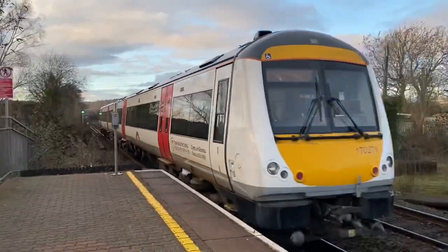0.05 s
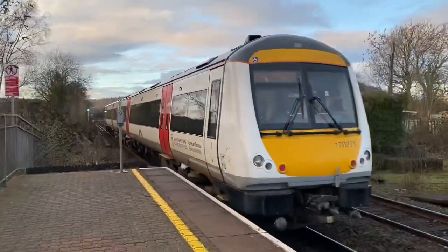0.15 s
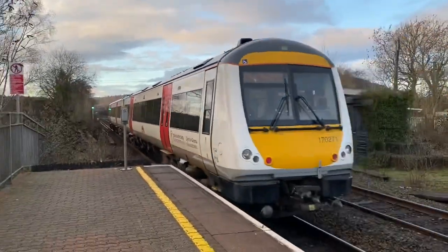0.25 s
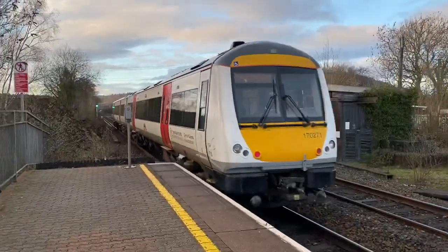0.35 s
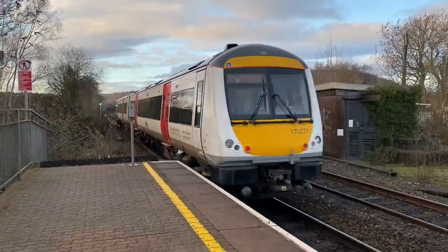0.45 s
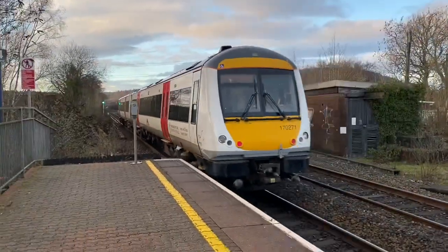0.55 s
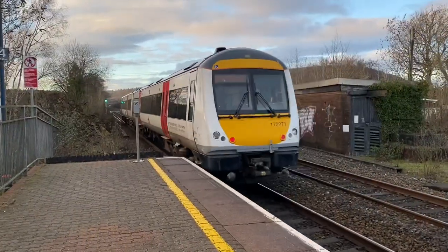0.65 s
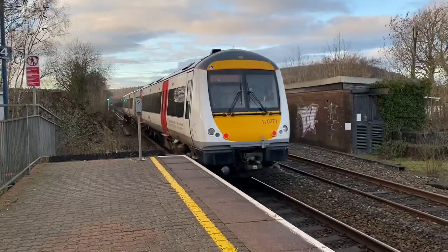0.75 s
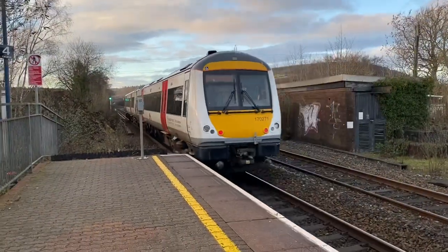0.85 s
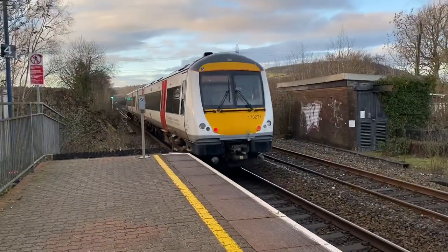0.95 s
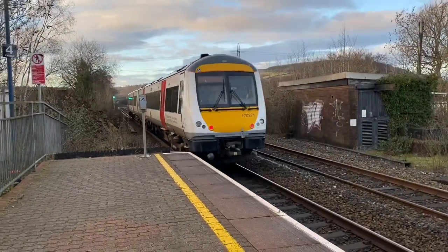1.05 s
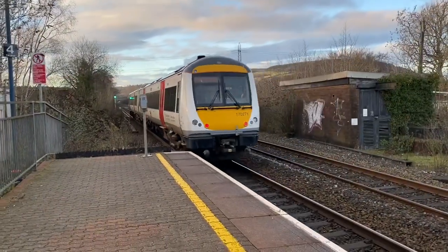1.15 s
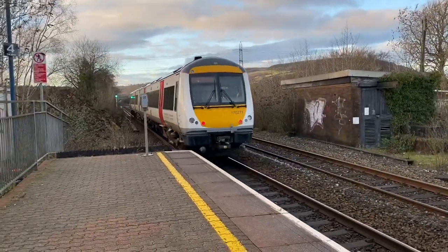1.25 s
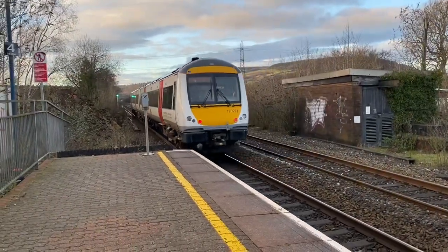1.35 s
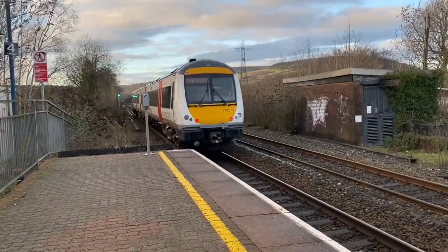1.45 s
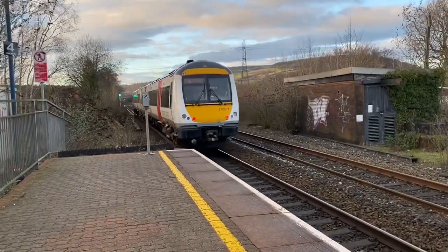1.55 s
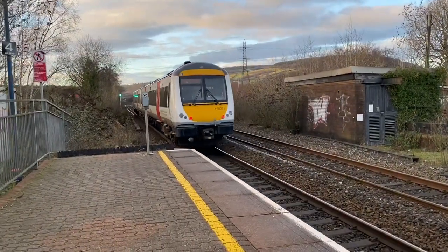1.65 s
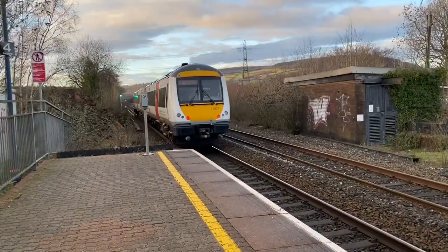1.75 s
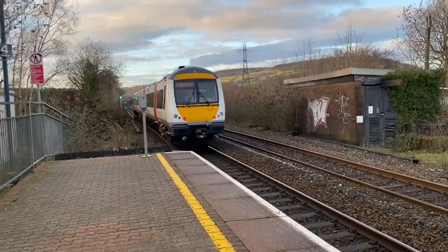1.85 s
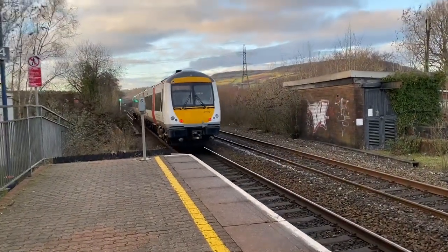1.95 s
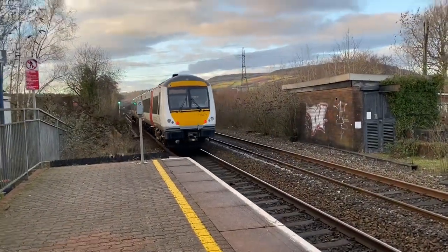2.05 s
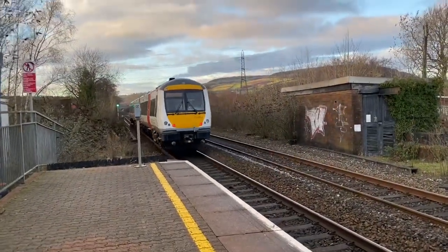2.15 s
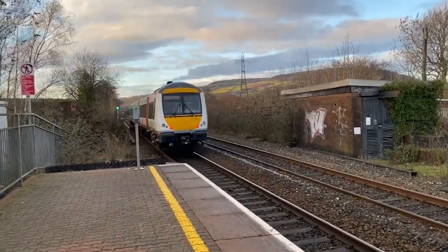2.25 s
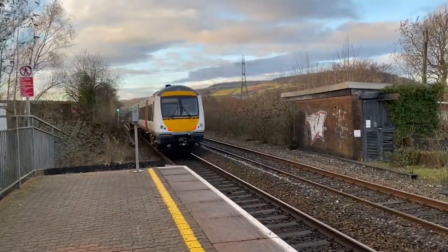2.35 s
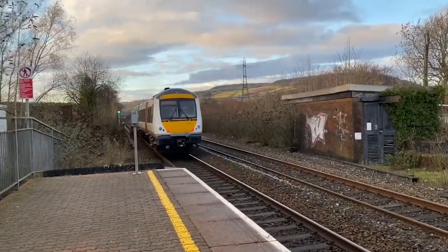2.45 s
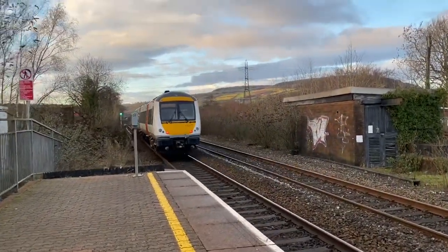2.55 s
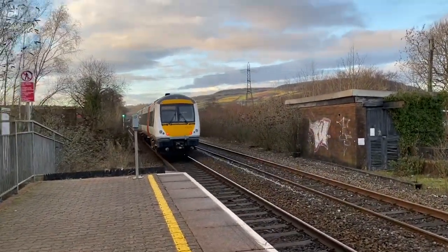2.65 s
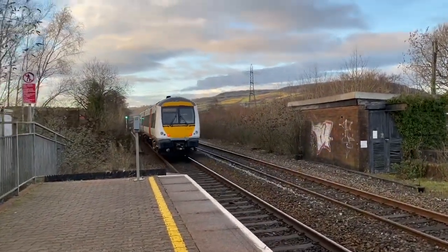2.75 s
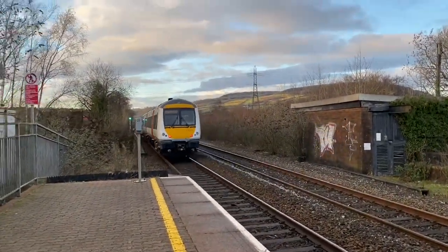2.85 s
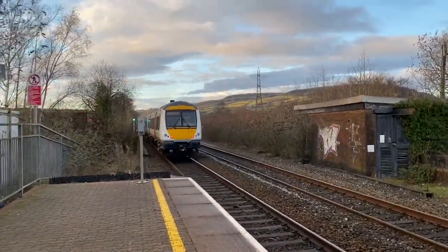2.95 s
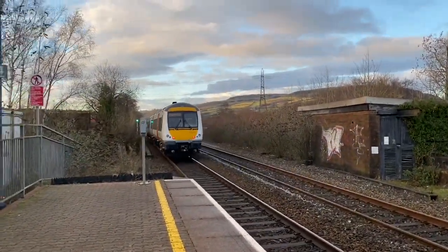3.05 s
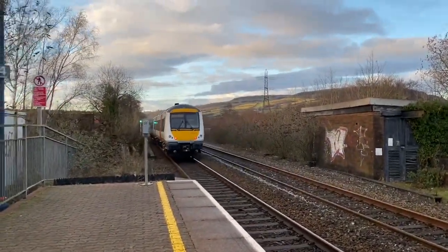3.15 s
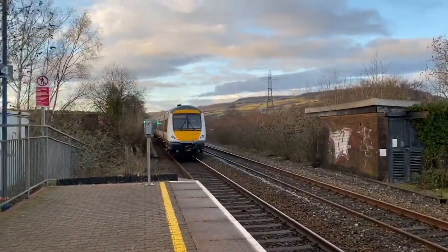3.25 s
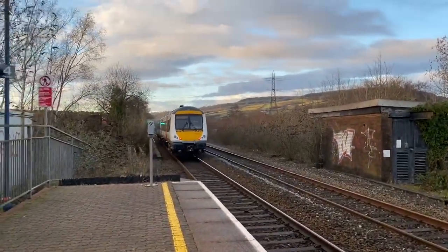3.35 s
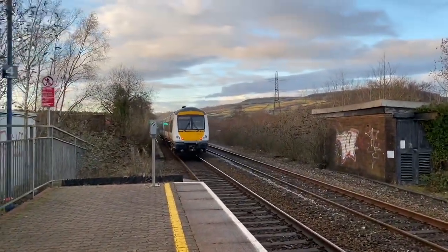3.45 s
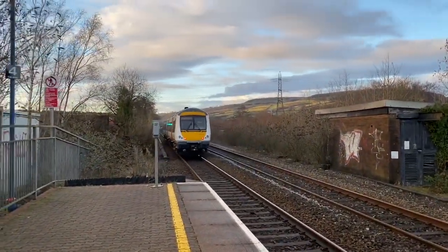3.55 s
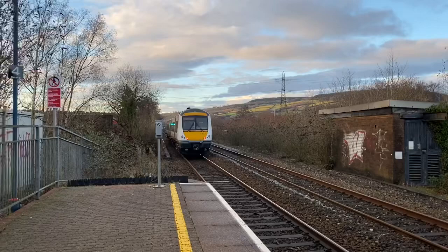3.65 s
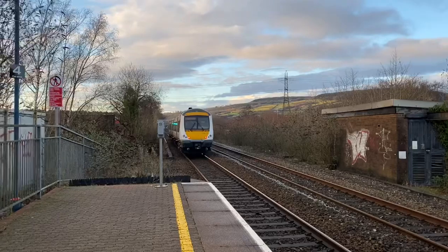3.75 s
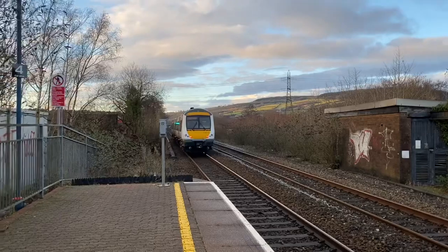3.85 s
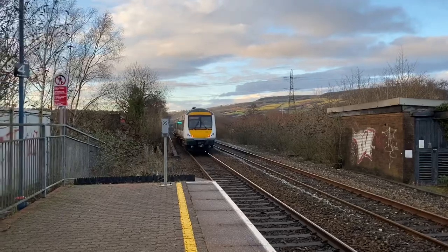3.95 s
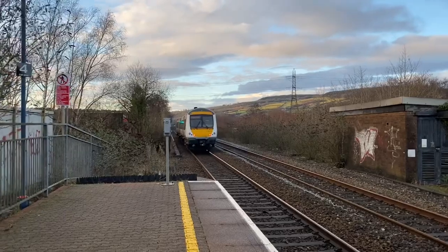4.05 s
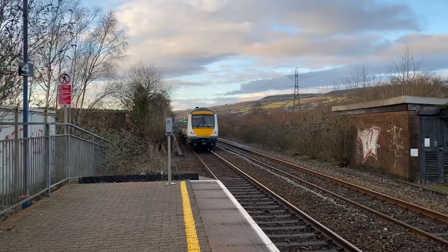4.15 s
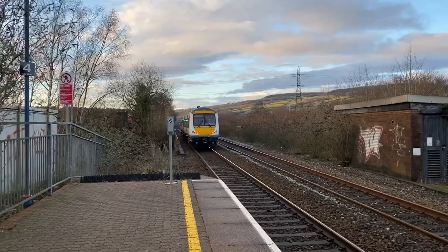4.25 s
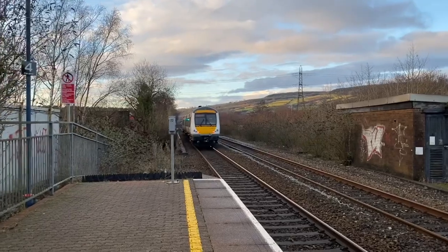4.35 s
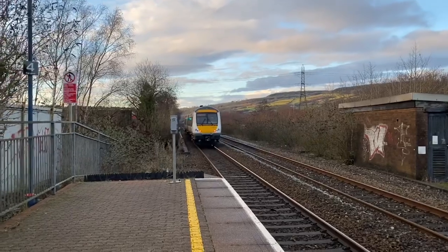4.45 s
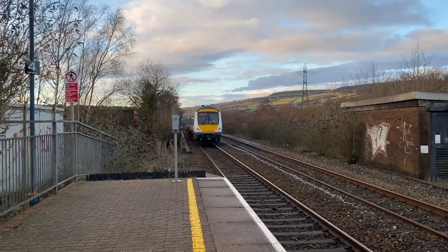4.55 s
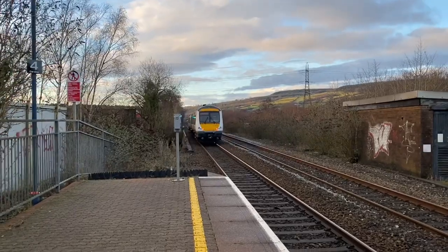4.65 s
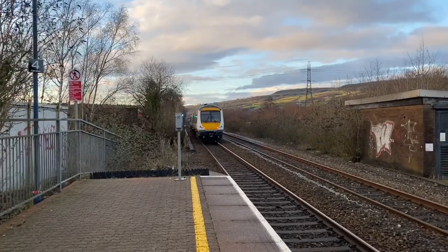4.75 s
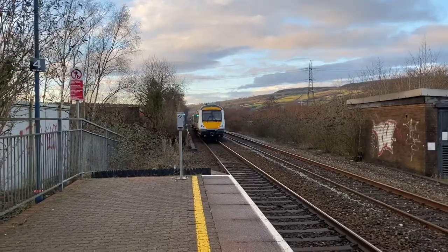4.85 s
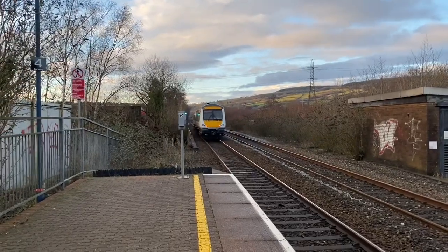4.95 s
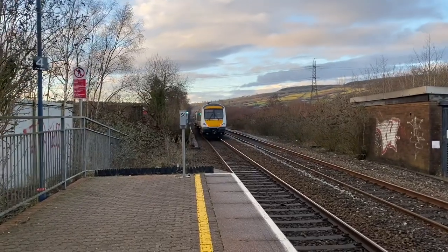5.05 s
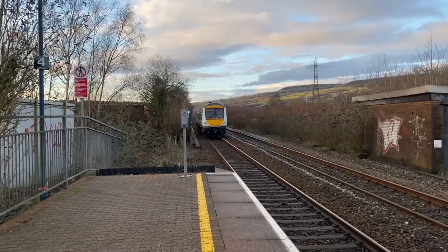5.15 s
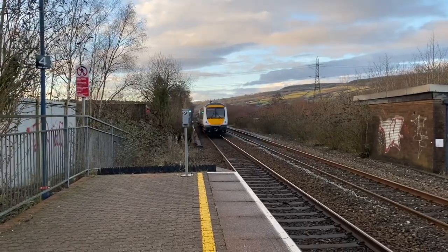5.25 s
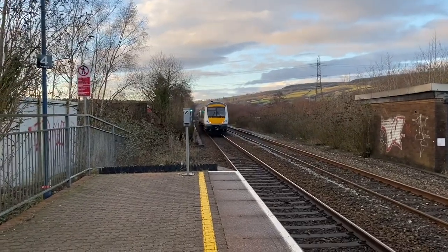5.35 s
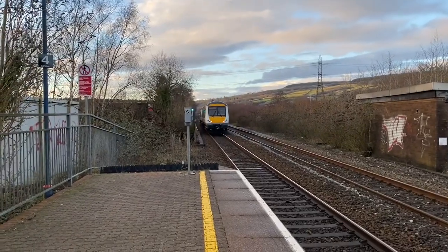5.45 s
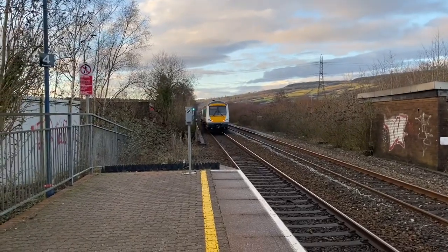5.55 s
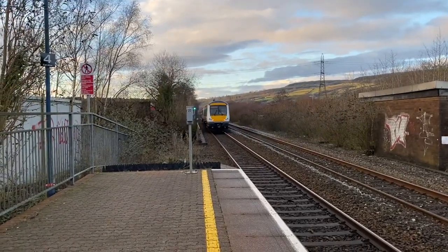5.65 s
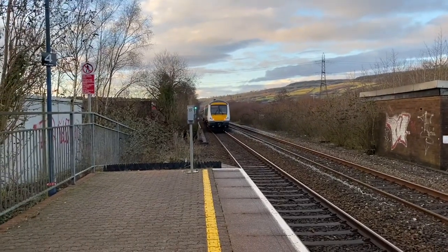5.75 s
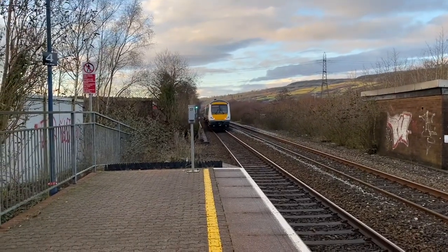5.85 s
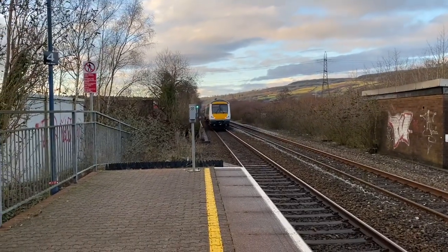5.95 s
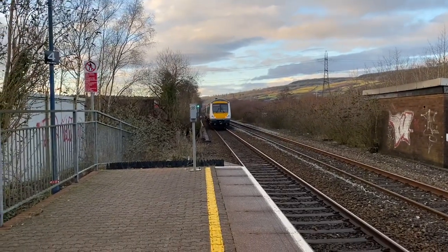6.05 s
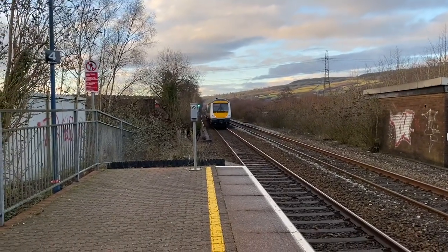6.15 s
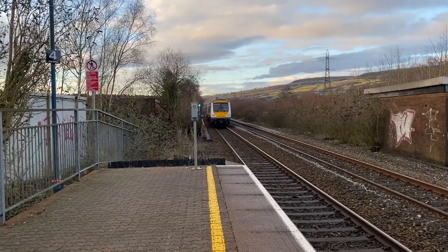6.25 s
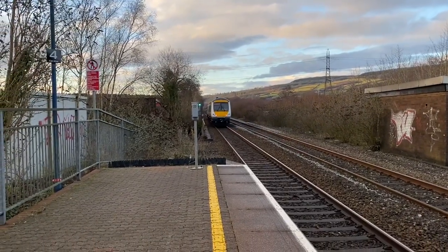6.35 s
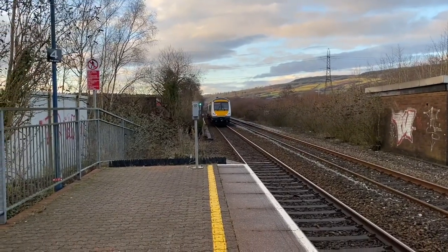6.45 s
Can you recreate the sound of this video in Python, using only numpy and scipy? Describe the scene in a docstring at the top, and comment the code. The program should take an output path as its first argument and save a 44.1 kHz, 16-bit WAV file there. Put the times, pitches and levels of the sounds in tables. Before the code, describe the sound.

A diesel train leaves a platform, heard close by in outdoor stereo, middle frequencies leaning slightly left. From 0 s it is near and loud: two engines drone with a low buzzing hum, one revving up in pitch over the first few seconds, the other steadier, so they throb together. Diesel knock, body rumble, clatter and hiss are strongest in the first second, with tiny dry knocks at 0.26 and 0.65 s. Around 0.6-1.2 s the exhaust barks and booms; wheels roar and ring faintly. At about 2-2.5 s a second bay passes with turbo whistle, fan wash and gear whine, and the hum swells until 4 s. From 2.8 s, and more busily after 3.6 s, small birds give quick, thin, high chirps with a short echo. The train dulls and shrinks to a soft hum; a light dry bump lands at 5.7 s. Birds continue to 6.5 s.

```python
"""A diesel railcar leaves a platform, heard through two close microphone ports.
From the start two six-cylinder engines drone as firing harmonics, one revving up; the drive shaft is a climbing sine.
Rung blows make the diesel knock; shaped noise makes rumble, clatter, hiss and open air; dry knocks are damped rings.
Noise bands make wheel roar and fan wash; narrow noise makes wheel rings, turbo whistles and gear singing.
From 2.8 s small birds, swept sines with an echo, come through as the train fades down the line."""
import sys
import numpy as np
from scipy import signal
from scipy.fft import rfft, irfft, next_fast_len
from scipy.io import wavfile
from scipy.ndimage import uniform_filter1d, map_coordinates

SR = 44100
rng = np.random.default_rng(int(sys.argv[2]) if len(sys.argv) > 2 else 0)


def store_wav(level_fs):
    """Save 16-bit WAV to argv[1]."""
    pcm = np.round(np.clip(np.atleast_2d(level_fs), -1, 1) * 32767)
    wavfile.write(sys.argv[1], SR, pcm.T.astype(np.int16))


N = 287091
TIME_S = np.arange(N) / SR


def amp(db):
    """Decibels to gain."""
    return 10 ** (np.asarray(db) / 20)


def unit(x):
    """Scale to rms 1."""
    return x / np.sqrt(np.mean(x ** 2) + 1e-20)


def along(points, hz):
    """Read (hz, value) points on a log frequency axis."""
    point_hz, value = np.transpose(points)
    return np.interp(np.log(hz + 1), np.log(point_hz + 1), value)


def curve(points):
    """Read (time_s, value) points at every sample."""
    point_s, value = np.transpose(points)
    return np.interp(TIME_S, point_s, value)


def wobble(knots_per_s):
    """Smooth random curve."""
    knots = rng.standard_normal(256)
    return map_coordinates(knots, [np.arange(N) * knots_per_s / SR], mode="mirror")


def filtered(x, response):
    """Multiply the spectrum of x by a response of frequency."""
    size = next_fast_len(N + 8192)
    spectrum = rfft(x, size) * response(np.fft.rfftfreq(size, 1 / SR))
    return irfft(spectrum, size)[..., :N]


def turns(hz):
    """Cycles completed at a changing rate."""
    return np.cumsum(hz) / SR


def tone(cycles):
    """Sine of rms 1, random starting phase."""
    return np.sqrt(2) * np.sin(2 * np.pi * (cycles + rng.random()))


def whistle(hz, width_hz):
    """Narrow noise of rms 1 around a moving pitch: slow noise on two quadrature carriers."""
    slow = filtered(rng.standard_normal((2, N)), lambda f: np.exp(-(f / width_hz) ** 2))
    angle = 2 * np.pi * turns(hz)
    return unit(slow[0] * np.cos(angle) + slow[1] * np.sin(angle))


def passing(peak_db, nearest_s, timescale_s, loss_db_per_doubling):
    """Level in dB of a source moving past, falling with each doubling of distance."""
    distance = np.hypot(1, (TIME_S - nearest_s) / timescale_s)
    return peak_db - loss_db_per_doubling * np.log2(distance)


def passing_in_turn(passes):
    """Joint gain of like noise sources going by in turn: powers add."""
    return np.sqrt(sum(amp(passing(*row)) ** 2 for row in passes))


# Left-right correlation: hz, likeness
ALIKE = [(60, 0.8), (200, 0.79), (400, 0.73), (700, 0.6), (1100, 0.17), (1600, -0.17), (2100, 0.62),
         (3000, 0.34), (4200, 0.64), (5400, 0.47), (7000, 0.9), (8000, 0.9), (8900, 1), (12000, 0.85)]


def coloured(pair, spectrum):
    """Give two unrelated sounds a spectrum and spread them over both ports, rms 1 in the middle."""
    def mid_side(hz):
        spread = np.arccos(np.clip(along(ALIKE, hz), -1, 1)) / 2
        return amp(along(spectrum, hz)) * [np.cos(spread), np.sin(spread)]

    mid, side = filtered(pair, mid_side)
    return np.array([mid + side, mid - side]) / np.std(mid)


def rush(spectrum, patchy_db):
    """Stereo noise, rms 1 in the middle, with drifting patches of gain in time and frequency."""
    bins = signal.stft(rng.standard_normal((2, N)), nperseg=1024)[2]
    field = uniform_filter1d(rng.standard_normal(bins.shape[1:]), size=5, axis=0)
    field = unit(uniform_filter1d(field, size=14, axis=1))
    noise = signal.istft(bins * amp(patchy_db * field), nperseg=1024)[1][:, :N]
    return coloured(noise, spectrum)


def exhaust(firing, levels_db, flutter_db):
    """Harmonics of the firing rate, each fluttering on its way through the air."""
    return sum(amp(db + flutter_db * wobble(8.1)) * tone(k * firing)
               for k, db in enumerate(levels_db, 1))


# Firing rate: time_s, firing_hz
REVVING = [(0, 64.3), (.5, 70.1), (1.05, 74.1), (1.7, 77.2), (2.2, 79.3), (3, 80.55), (3.7, 81.95),
           (4.2, 82.5), (5.3, 82.45), (6.51, 82.65)]
# Second harmonic, the main hum: time_s, level_db
HUM_LEVEL = [(0, -27.5), (.7, -39), (1.1, -33), (1.6, -39), (2, -31.5), (2.35, -26.5), (2.6, -25.5),
             (3.5, -26), (4.25, -27.5), (4.75, -29), (5.3, -36), (6, -30.5), (6.51, -32.5)]
# Third harmonic: time_s, level_db
THIRD_LEVEL = [(0, -39), (.45, -38), (.8, -24.5), (1.05, -29), (1.42, -41), (1.6, -31.5), (2.2, -30.5),
               (2.78, -27), (2.98, -34), (3.4, -39), (3.7, -55), (4, -41), (4.6, -41), (4.95, -47.5),
               (5.4, -42), (6.51, -45)]
# Fourth harmonic, barking as the exhaust goes by: time_s, level_db
BARK_LEVEL = [(0, -66), (.5, -52), (.63, -30), (.85, -30.5), (1.05, -31), (1.3, -66), (2.2, -57),
              (3, -53.5), (6.51, -67)]
FUNDAMENTAL_RE_SECOND_DB, FIFTH_RE_FOURTH_DB = -19, -13


def revving_engine():
    """Clean rising harmonics: upper ones bark close by, the second carries down the line."""
    hum_db, third_db, bark_db = curve(HUM_LEVEL), curve(THIRD_LEVEL), curve(BARK_LEVEL)
    levels_db = [hum_db + FUNDAMENTAL_RE_SECOND_DB, hum_db, third_db, bark_db, bark_db + FIFTH_RE_FOURTH_DB]
    return exhaust(turns(curve(REVVING)), levels_db, flutter_db=0.8)


def echo_beat_db(null_s, period_s, share):
    """Gain of a tone whose echo slips in and out of step as the train moves."""
    slip = (TIME_S - null_s) / period_s
    return 20 * np.log10(np.abs(1 - np.clip(share, 0, 1) * np.exp(2j * np.pi * slip)) + 1e-6)


# Firing rate of the engine already under load: time_s, firing_hz
LOADED = [(0, 77.1), (.95, 75.55), (1.5, 75.9), (2.5, 75.65), (3.3, 74.1), (3.7, 73.6), (4.2, 74.1),
          (5, 76.25), (5.8, 77.65), (6.51, 78.3)]
# Fundamental: time_s, level_db
BOOM = [(0, -29), (.45, -35), (.99, -28), (1.11, -22.5), (1.9, -27), (2.9, -31.5), (4.2, -31), (5, -41),
        (6.51, -44)]
# Common level of harmonics 2 and 3: peak_db, nearest_s, timescale_s, loss_db_per_doubling
OVERTONE_PASS = (-33.5, 0.5, 3.5, 10)
# Harmonics 2 and 3 over that: offset_db, extra_fade_db_per_s, null_s, beat_period_s, echo_share
OVERTONES = [(2, 0.6, 1.94, 3.1, 0.17), (-2, 0.38, 3.02, 1.98, 0.41)]
# Fourth harmonic, carrying briefly: peak_db, nearest_s, timescale_s, loss_db_per_doubling
FOURTH_PASS = (-42, 3.5, .5, 6.5)
# Crank tones: crank_multiple, level_db before the bay gain
CRANK_TONES = [(2.5, -48), (7.5, -42), (11, -43), (13.5, -49), (19, -54.5), (27, -55)]
# Gain of the open bay: peak_db, nearest_s, timescale_s, loss_db_per_doubling
BAY_PASS = (0.55, 1.4, 1.9, 13)
# Timing gear whine: peak_db, nearest_s, timescale_s, loss_db_per_doubling
WHINE_PASS = (-49.5, 2.3, 0.55, 12)


def loaded_engine():
    """Steadier firing harmonics, crank tones from the open bay and a wavering timing gear whine."""
    firing = turns(curve(LOADED))
    crank = firing / 3  # six cylinders: three firings a turn
    levels_db = [curve(BOOM)]
    for offset_db, fade_db_per_s, *beat in OVERTONES:
        levels_db.append(passing(*OVERTONE_PASS) + offset_db - fade_db_per_s * TIME_S + echo_beat_db(*beat))
    levels_db.append(passing(*FOURTH_PASS))
    crank_tones = sum(amp(db + 2.5 * wobble(6)) * tone(order * crank + 0.09 * wobble(12))
                      for order, db in CRANK_TONES)
    bay = amp(passing(*BAY_PASS)) * crank_tones
    teeth = 54 * crank
    whine = amp(passing(*WHINE_PASS) + 1.5 * wobble(9.9)) * tone(teeth + 0.089 * wobble(25.14))
    return exhaust(firing, levels_db, flutter_db=1.1) + bay + whine


# Hum: time_s, level_db
SHAFT_LEVEL = [(0, -39), (1.3, -30.5), (1.9, -33.5), (2.3, -37.5), (6.51, -65)]
SHAFT_START_HZ, SHAFT_CLIMB_HZ_PER_S = 81.6, 4.6


def drive_shaft():
    """Hum climbing as the train gathers speed, throbbing against the loaded engine."""
    hz = SHAFT_START_HZ + SHAFT_CLIMB_HZ_PER_S * TIME_S
    return amp(curve(SHAFT_LEVEL) + 1.2 * wobble(21.0)) * tone(turns(hz))


# Two swells of knock: peak_db, nearest_s, timescale_s, loss_db_per_doubling
BLOCK_PASS = [(-34, .28, .65, 8), (-45.5, 2.3, .8, 7)]
# Block ring spectrum: hz, db_per_hz
BLOCK = [(250, -30), (350, -12), (420, -3), (510, -4), (610, 2.5), (710, 3), (800, -3.5), (950, -10),
         (1150, -13), (1500, -28), (3000, -60)]


def diesel_knock(t60_s, scatter_db, cylinders):
    """Firings strike the loaded engine's block; each cylinder has its own decaying noise ring."""
    firing = turns(curve(LOADED))
    strike_at = np.searchsorted(firing, np.arange(1, int(firing[-1])))
    blows = np.zeros((cylinders, 1, N))
    cylinder = np.arange(len(strike_at)) % cylinders
    blows[cylinder, 0, strike_at] = amp(scatter_db * rng.standard_normal(len(strike_at)))
    t = np.arange(SR // 10) / SR
    rings = rng.standard_normal((cylinders, 2, len(t))) * amp(-60 * t / t60_s)
    pair = signal.oaconvolve(blows, rings, axes=2).sum(axis=0)[:, :N]
    return passing_in_turn(BLOCK_PASS) * coloured(pair, BLOCK)


# Body spectrum: hz, db_per_hz
BODY = [(20, -40), (35, -34), (50, -10), (65, 0), (100, -3), (140, -1), (200, -4), (280, -8), (360, -13),
        (480, -29), (800, -76), (2000, -120)]


def lope(firing, count, scatter_db):
    """Unequal cylinders repeat every six firings: weak lines between the harmonics, rms 1."""
    cycle = firing / 6
    cycle_hz = cycle[-1] * SR / N  # mean rate
    orders = [k for k in range(1, count) if k % 6]
    return unit(sum(amp(along(BODY, k * cycle_hz) + scatter_db * wobble(0.98)) * tone(k * cycle)
                    for k in orders))


# Body noise: time_s, level_db
RUMBLE_LEVEL = [(0, -30.5), (.9, -30), (1.4, -33.5), (2.2, -34), (2.8, -33.5), (3.5, -34.5), (4.3, -37),
                (5.1, -38.5), (6.51, -42.5)]
LOPE_RE_RUMBLE_DB = -3.5


def body_rumble():
    """Low noise of the car bodies with the loaded engine's lope in it."""
    loping = lope(turns(curve(LOADED)), count=30, scatter_db=3.5)
    return amp(curve(RUMBLE_LEVEL)) * (rush(BODY, patchy_db=2) + amp(LOPE_RE_RUMBLE_DB) * loping)


# Two engine bays in turn: peak_db, nearest_s, timescale_s, loss_db_per_doubling
CLATTER_PASS = [(-43.5, 0.07, 3.1, 6.5), (-46.5, 2.2, 0.33, 5)]
# Clatter spectrum: hz, db_per_hz
CLATTER = [(1200, -14.5), (1620, -8), (1900, 2), (2200, -2.5), (2550, -2), (2950, -5), (3600, -6),
           (4400, -7.5), (5100, -13), (6000, -15), (7500, -19), (12000, -120)]


def bay_clatter():
    """Patchy treble noise from the clattering engine bays."""
    return passing_in_turn(CLATTER_PASS) * rush(CLATTER, patchy_db=1.7)


# Hiss treble: time_s, level_db
HISS_TREBLE = [(0.0, -55), (0.03, -54.5), (0.49, -54.5), (0.59, -56), (1.9, -58), (3.53, -67), (4.58, -67),
               (6.3, -74)]
# Hiss spectrum: hz, db_per_hz
HISS = [(1500, -63), (4000, -7.5), (5800, -3), (6900, 2), (7800, -3), (8400, 1), (9000, -2), (9750, 8),
        (10600, -5), (12200, -5), (13200, -8), (14200, -16), (15800, -16)]
HISS_RE_TREBLE_DB = 9.5  # the whole hiss over its treble


def rail_hiss(port_lag_ms, air_loss_db_per_db):
    """Rail and air hiss; distance takes its top away first."""
    level_db = curve(HISS_TREBLE) + HISS_RE_TREBLE_DB
    noise = rush(HISS, patchy_db=1.5)
    top = filtered(noise, lambda hz: 1 / (1 + (11000 / (hz + 1)) ** 12))
    fading_top = top * amp(air_loss_db_per_db * (level_db - level_db[0]))
    hiss = (noise - top + fading_top) * amp(level_db + 0.099 * wobble(23))
    lag_s = np.array([[port_lag_ms / 1000], [0]])  # left port hears it later
    return filtered(hiss, lambda hz: np.exp(-2j * np.pi * hz * lag_s))


# Open air spectrum: hz, db_per_hz
OUTDOORS = [(20, -19), (48, 1), (70, -20), (300, -15), (600, -21.5), (950, -32), (1550, -12.5), (2100, -29),
            (5000, -65)]
OUTDOORS_DB = -52


def open_air():
    """Steady outdoor noise behind the train."""
    return amp(OUTDOORS_DB) * rush(OUTDOORS, patchy_db=3.0)


# Small dry knocks: start_s, pitch_hz, t60_s, ring_level_db
KNOCKS = [(.2555, 790, .011, -15.5), (.6492, 700, .011, -18), (5.695, 848, .012, -26),
          (5.711, 105, .04, -25)]


def knocks(crack):
    """Damped ring under a very short, dull crack."""
    out, t = np.zeros(N + SR), np.arange(SR // 5) / SR
    for start_s, hz, t60_s, db in KNOCKS:
        ring = np.sin(2 * np.pi * hz * t) * amp(-60 * t / t60_s)
        lowpass = signal.butter(2, 2 * hz, fs=SR)
        burst = unit(signal.lfilter(*lowpass, rng.standard_normal(len(t)))) * amp(-60 * t / 0.0052)
        out[round(start_s * SR):][:len(t)] += amp(db) * (ring + crack * burst)
    return out[:N]


# Near bogie, then the next: peak_db, nearest_s, timescale_s, loss_db_per_doubling
WHEEL_PASS = [(-40, 0.96, 0.69, 7.5), (-43, 2.3, 1.02, 3)]
# Near bogie spectrum: hz, db_per_hz
NEAR_WHEELS = [(200, -40), (330, -22), (420, -3.5), (480, 4), (520, 0.5), (600, -2), (680, 0), (800, -3.5),
               (950, -1), (1100, -5), (1400, -19), (4000, -120)]
# Next bogie spectrum: hz, db_per_hz
NEXT_WHEELS = [(200, -29), (330, -4), (420, 3), (480, 4.5), (560, 0), (670, -1.5), (760, -5), (860, -0.5),
               (980, -3), (1400, -14.5), (4000, -120)]


def wheel_roar():
    """Two bogies roll by in turn, each a band of patchy noise."""
    return sum(amp(passing(*row)) * rush(spectrum, patchy_db=2.2)
               for row, spectrum in zip(WHEEL_PASS, (NEAR_WHEELS, NEXT_WHEELS)))


# Wheel and rail resonances: centre_s, half_length_s, pitch_hz, peak_level_db
RINGS = [(0.937, 0.79, 2245, -52), (1, 0.7, 1925, -55.5), (1.118, .06, 485, -39.5), (2.4, 0.31, 885, -50),
         (2.946, 0.17, 971, -49), (3.097, 0.27, 482, -45.5), (3.52, .06, 99, -30), (5.385, 0.18, 101, -38),
         (5.74, .07, 53, -41), (5.8, .14, 128, -41), (6.1, 0.082, 106, -33)]
RING_WIDTH_PER_HZ = .014


def wheel_rings():
    """Narrow resonances of wheel and rail that swell and die away."""
    out = np.zeros(N)
    for centre_s, half_s, hz, db in RINGS:
        swell = amp(db) / (1 + ((TIME_S - centre_s) / half_s) ** 2)
        out += swell * whistle(np.full(N, hz), RING_WIDTH_PER_HZ * hz)
    return out


# Revving engine's turbocharger: peak_db, nearest_s, timescale_s, loss_db_per_doubling
REVVING_TURBO = (-47.7, 1.15, 0.85, 11)
# Loaded engine's turbocharger: peak_db, nearest_s, timescale_s, loss_db_per_doubling
LOADED_TURBO = (-51, 2.2, 0.45, 11)
REVVING_BLADES_PER_FIRING, LOADED_BLADES_PER_FIRING = 32.5, 34.5  # blade tone over firing rate


def turbo(width_hz, flutter_db):
    """Two breathy, fluttering whistles around their blade tones."""
    engines = [(REVVING, REVVING_BLADES_PER_FIRING, REVVING_TURBO),
               (LOADED, LOADED_BLADES_PER_FIRING, LOADED_TURBO)]
    return sum(amp(passing(*row) + flutter_db * wobble(20)) * whistle(ratio * curve(firing_hz), width_hz)
               for firing_hz, ratio, row in engines)


# Cooling fan: peak_db, nearest_s, timescale_s, loss_db_per_doubling
FAN_PASS = (-41.5, 2, 1.1, 5)
# Fan spectrum: hz, db_per_hz
FAN = [(550, -12), (780, -5), (920, -2.5), (1150, -1), (1380, -0.5), (1550, -7.5), (1800, -7.5),
       (2050, -15), (2600, -49), (7000, -120)]


def fan_wash():
    """Patchy noise of the cooling fan going by."""
    return amp(passing(*FAN_PASS)) * rush(FAN, patchy_db=1.5)


# Singing bands: crank_multiple, width_hz, level_db before the bay gain
GEAR_BANDS = [(36.12, 146, -47.5), (53.9, 37, -51.5), (77.3, 220, -49.5)]
# Gain as the bay goes by: peak_db, nearest_s, timescale_s, loss_db_per_doubling
GEAR_PASS = (-.5, 2.35, 0.6, 11)


def gear_train(surge_db):
    """Rough, surging bands of gear noise, tied to the loaded engine's crank."""
    crank_hz = curve(LOADED) / 3
    bands = sum(amp(db + surge_db * wobble(11)) * whistle(order * crank_hz, width_hz)
                for order, width_hz, db in GEAR_BANDS)
    return amp(passing(*GEAR_PASS)) * bands


# Clear notes: start_s, length_s, start_hz, end_hz, level_db before envelope and echo mix
CHIRPS = [(2.815, 0.052, 6130, 6330, -48), (3.655, .022, 4950, 4800, -47),
          (3.795, 0.047, 4150, 3650, -43.5), (3.84, 0.052, 3700, 3420, -39.5),
          (3.895, 0.039, 6440, 6240, -48), (4.2, 0.029, 5750, 5950, -47), (4.226, 0.012, 6000, 6200, -44),
          (4.237, .014, 5600, 4900, -44), (4.307, 0.021, 5500, 6000, -43), (4.318, 0.021, 3440, 3270, -42),
          (4.368, 0.022, 3450, 3800, -44), (4.573, 0.02, 4800, 5130, -48), (4.607, .014, 4920, 4400, -48),
          (4.622, 0.018, 3820, 3370, -42), (4.69, 0.026, 5400, 5230, -49),
          (4.735, 0.037, 3770, 3430, -44.5), (4.715, 0.023, 4650, 4500, -48),
          (4.745, .025, 4350, 4250, -44), (4.765, 0.027, 5200, 4880, -47), (5.008, 0.04, 5270, 5400, -46),
          (5.048, 0.023, 3250, 3700, -42), (5.195, .045, 3600, 3290, -49), (5.345, 0.022, 3500, 3800, -45),
          (5.375, .018, 5500, 5600, -47), (5.376, .016, 3680, 3580, -45), (5.402, 0.021, 4670, 5900, -42),
          (5.418, 0.029, 5450, 5980, -44), (5.437, .016, 5900, 4600, -42), (5.445, .025, 6100, 5650, -49),
          (5.503, .025, 5700, 5100, -47), (5.711, .026, 5230, 5100, -46), (5.899, 0.016, 5400, 5340, -45),
          (6.035, 0.014, 5400, 5520, -52), (6.053, .017, 5000, 5170, -45),
          (6.085, 0.058, 3490, 3290, -44.5), (6.163, 0.023, 5330, 5080, -47),
          (6.184, 0.018, 5280, 5670, -41), (6.237, 0.018, 3570, 3870, -45), (6.32, .016, 5160, 5170, -48),
          (6.345, 0.055, 4800, 4700, -50)]
# Faint notes, start range: first_s, last_s
TWITTER_S = (5.3, 6.3)
# Faint notes, starting pitch range: low_hz, high_hz
TWITTER_HZ = (3330, 5280)
TWITTER_DB, TWITTER_NOTE_S, TWITTER_MAX_FALL_HZ = -54, 0.019, 500


def birds(rasp, t60_s, echo_db, faint_count):
    """Quick rasped sweeps, fainter notes in between and a short noise-tail echo from the trees."""
    notes = list(CHIRPS)
    for when, height, fall in rng.random((faint_count, 3)):
        start_s = np.interp(when, (0, 1), TWITTER_S)
        hz = np.interp(height, (0, 1), TWITTER_HZ)
        notes.append((start_s, TWITTER_NOTE_S, hz, hz - fall * TWITTER_MAX_FALL_HZ, TWITTER_DB))
    song = np.zeros(N + SR)
    for start_s, length_s, start_hz, end_hz, db in notes:
        u = np.linspace(0, 1, int(length_s * SR))
        shake = map_coordinates(rng.standard_normal(128), [u * length_s * 400], mode="mirror")
        pitch_hz = (start_hz + (end_hz - start_hz) * u) * (1 + rasp * shake)
        song[round(start_s * SR):][:len(u)] += amp(db) * np.sqrt(u * (1 - u)) * tone(turns(pitch_hz))
    song = song[:N]
    t = np.arange(SR // 2) / SR
    tail = rng.standard_normal((2, len(t))) * amp(-60 * t / t60_s)
    tail /= np.linalg.norm(tail[0])
    echo = signal.fftconvolve(song[None], tail, axes=1)[:, :N]
    return (song + amp(echo_db) * echo) / np.hypot(1, amp(echo_db))


# Port balance: hz, left_minus_right_db
LEAN = [(60, -0.5), (200, -0.3), (380, 1), (700, 2.5), (1300, 3.5), (2400, 2.5), (4400, 3), (8000, 0)]


def scene():
    """Train, knocks, birds and open air; the middle frequencies lean to the left."""
    drone = revving_engine() + loaded_engine() + drive_shaft()
    knock = diesel_knock(t60_s=.09, scatter_db=1, cylinders=6)
    running = body_rumble() + bay_clatter() + rail_hiss(port_lag_ms=.272, air_loss_db_per_db=.2)
    rolling = wheel_roar() + wheel_rings()
    machinery = turbo(width_hz=205, flutter_db=2) + fan_wash() + gear_train(surge_db=2)
    train = drone + knock + running + rolling + machinery
    song = birds(rasp=0.025, t60_s=0.3, echo_db=-3, faint_count=18)
    mix = train + open_air() + knocks(crack=0.35) + song
    return filtered(mix, lambda hz: amp(along(LEAN, hz) * np.array([[.5], [-.5]])))


TOP_HZ = 15700


def record(dry):
    """Keep nothing at or above the band limit."""
    return filtered(dry, lambda hz: hz < TOP_HZ)


dry = scene()
out = record(dry)
store_wav(out)
```